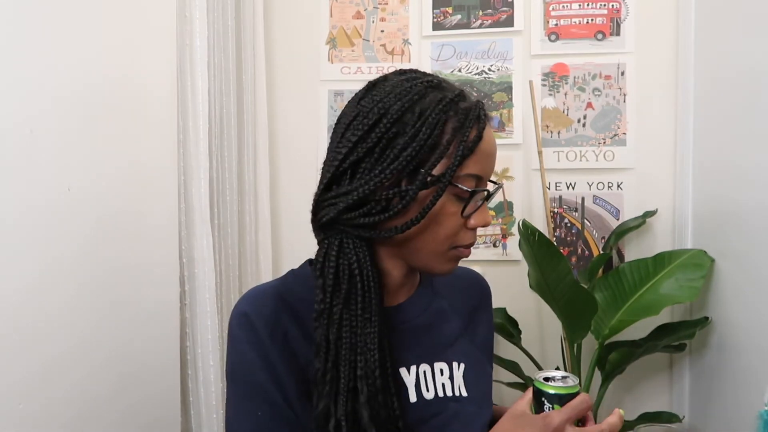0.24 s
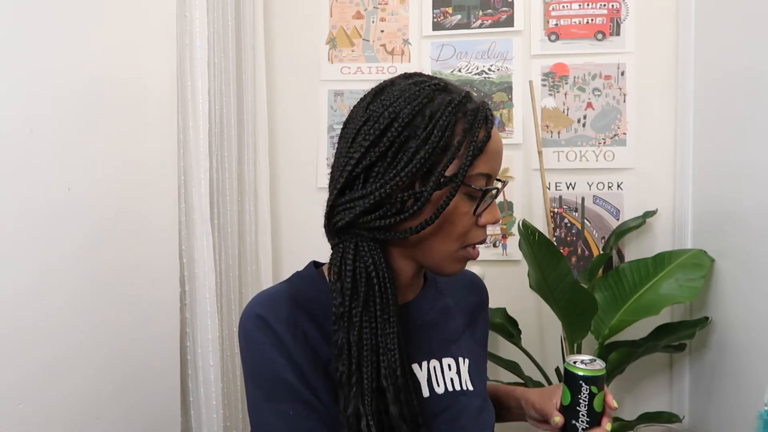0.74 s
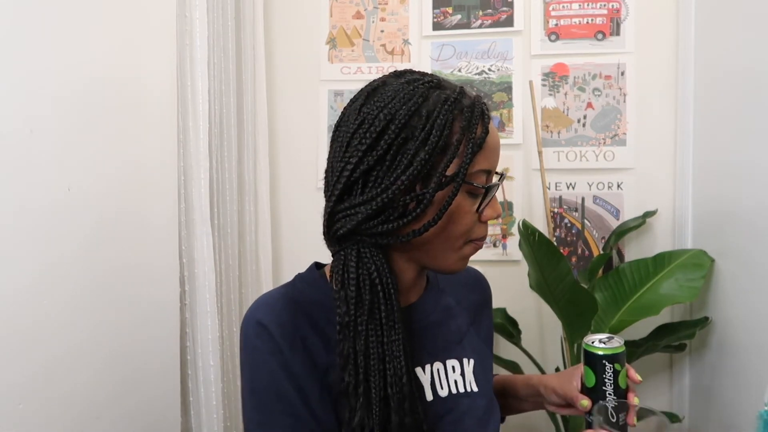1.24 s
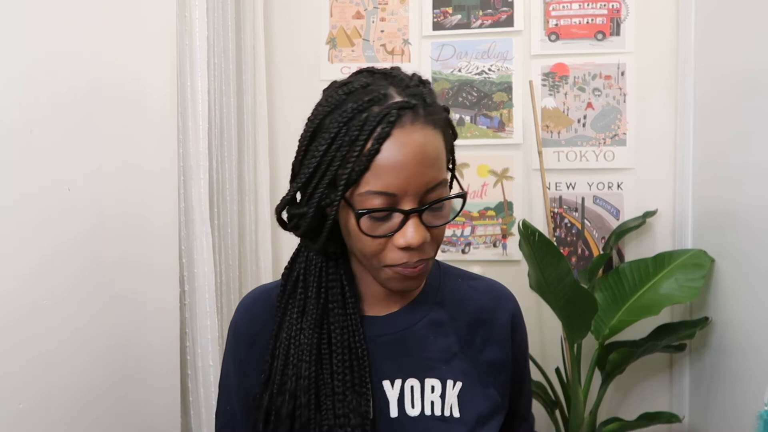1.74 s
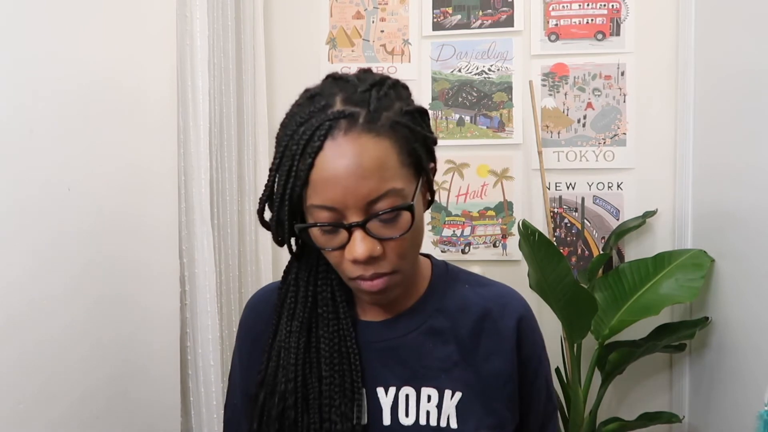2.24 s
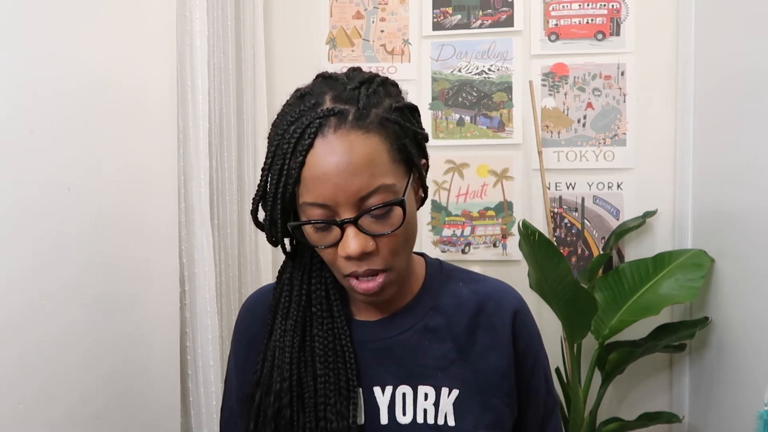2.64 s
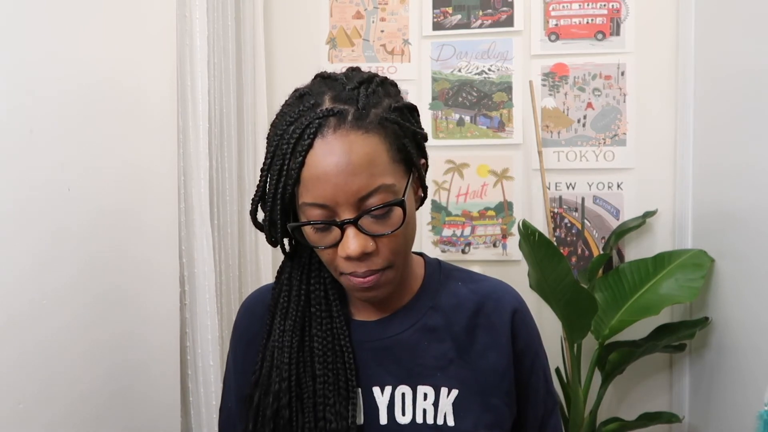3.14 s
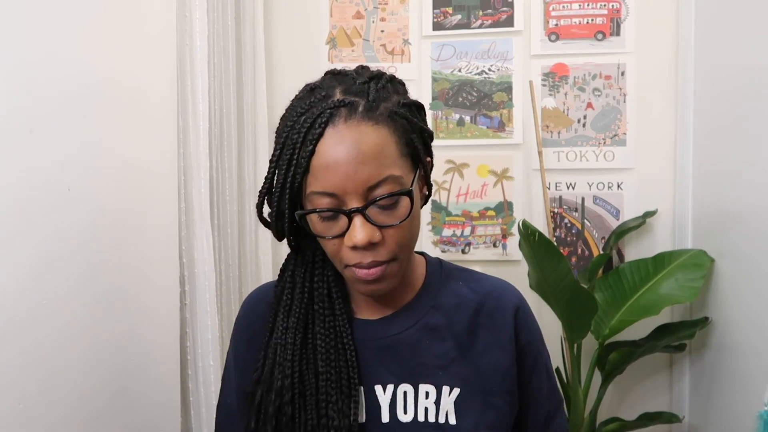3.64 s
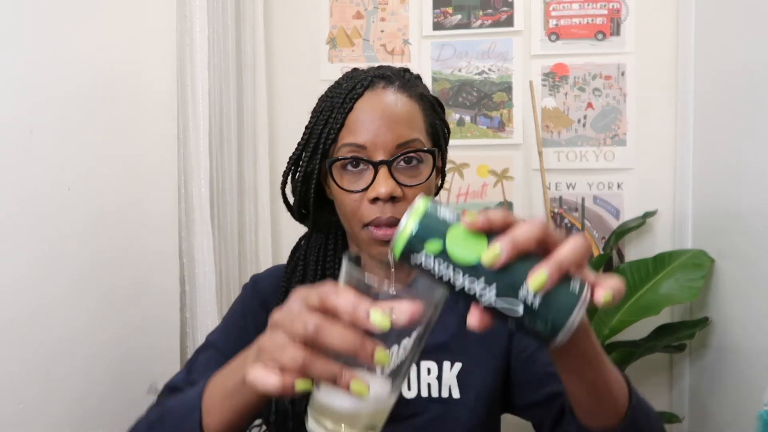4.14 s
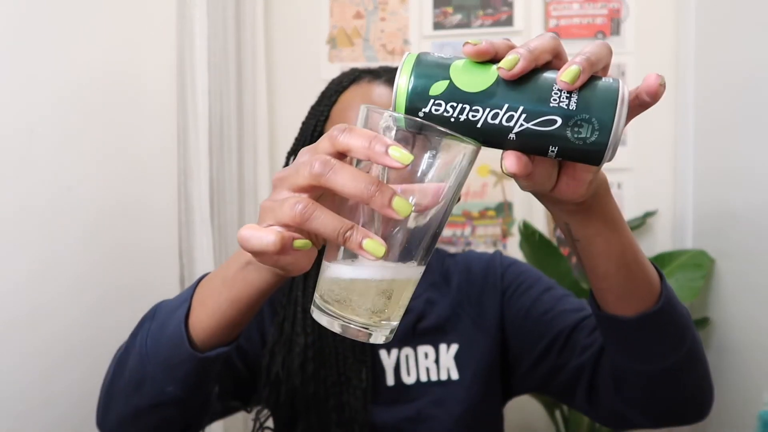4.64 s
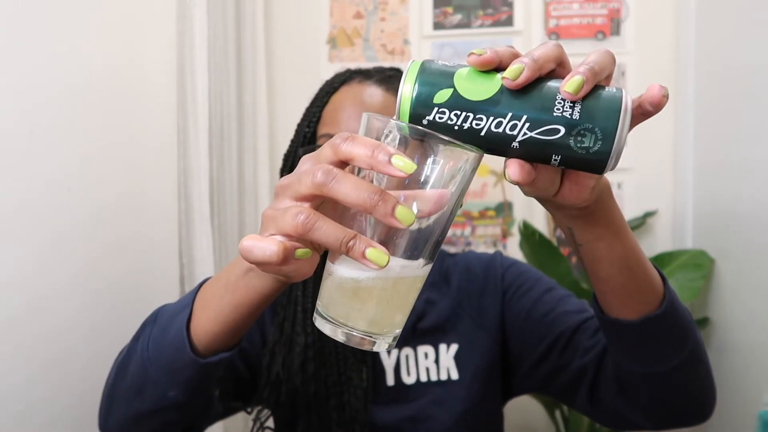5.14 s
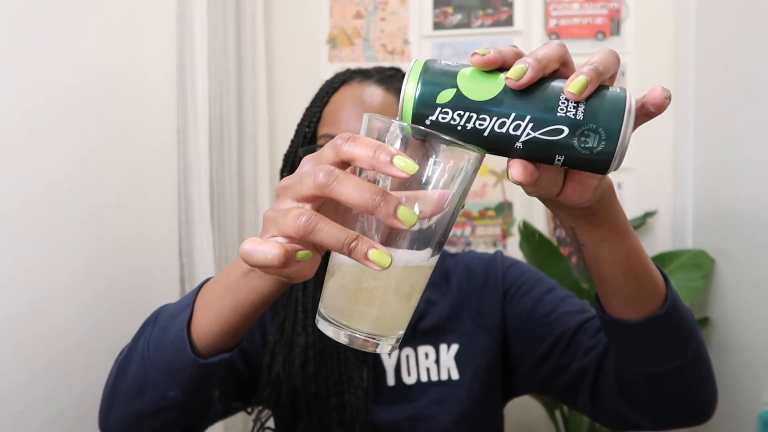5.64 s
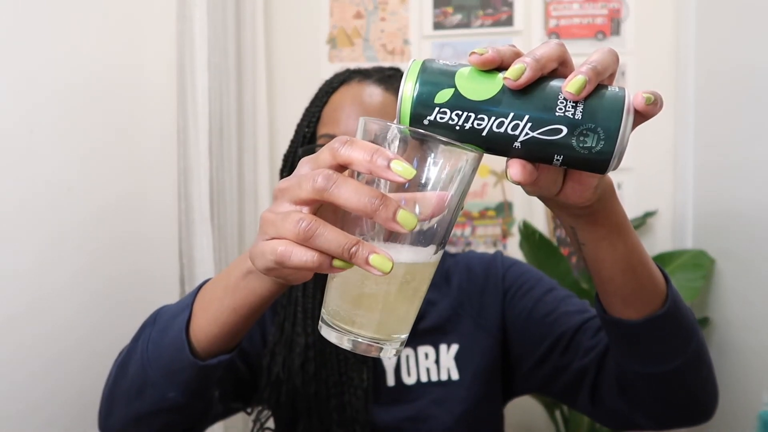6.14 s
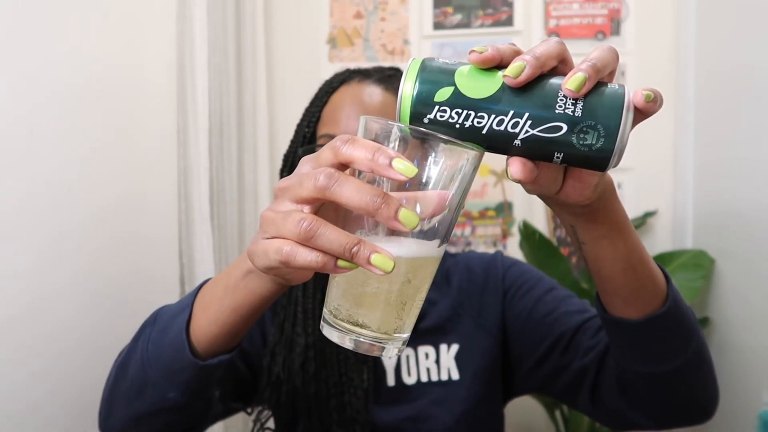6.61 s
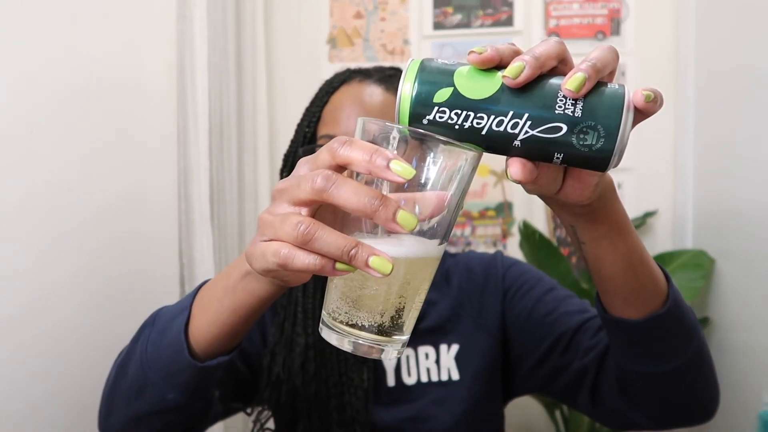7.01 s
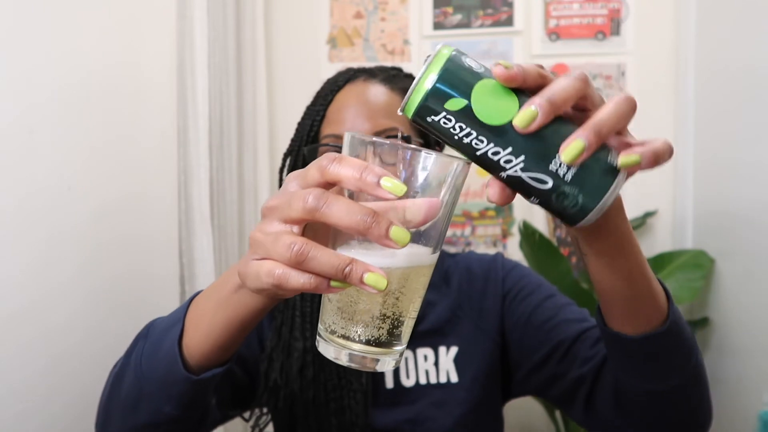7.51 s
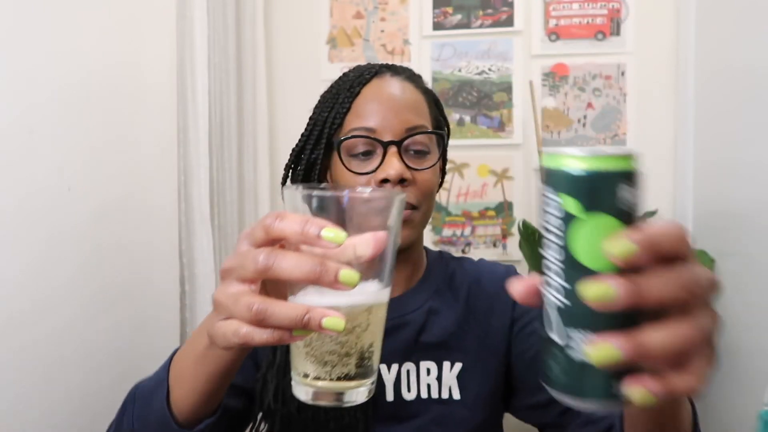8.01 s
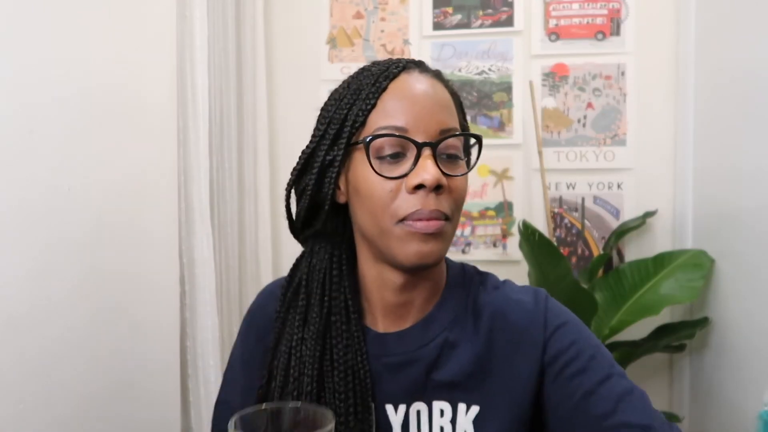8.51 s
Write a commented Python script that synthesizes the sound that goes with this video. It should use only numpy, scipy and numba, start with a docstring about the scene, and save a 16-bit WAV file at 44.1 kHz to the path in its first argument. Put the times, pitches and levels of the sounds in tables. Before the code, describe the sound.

A close mono sound in a small, fairly dry room with steady low electric hum, deep uneven rumble and faint hiss. A soft table thud comes at 0.1 s, followed by sparse faint scrapes and ticks of a handled can, growing busier from 1.7 to 2.4 s with a light bump at 2.3. At about 2.5 s fizzy juice hits the glass with a bright spit and gushes until 3.9: hollow glugs, splashes and one especially strong plop near 3.2, ending in a crowded gurgle and a swell of fizz. Foam hisses alone until 4.7, when a shorter, softer gush runs to 5.15. It thins into a gentle bubbling trickle until about 7.7, with a faint knock near 6.9 and the glass's resonance shifting as it fills. Fine fizz lingers, rising slightly, and at 8.55 a firm low thud with a small metallic clack sets the can down.

```python
"""Clicks and bumps of a handled can, then two gushes and a thinning trickle of fizzy juice into a glass;
foam fizzes on, a last bump sets the can down; low electric hum, rumble and hiss in a small room.
Bubbles are damped sines, drops and scrapes are noise bursts, fizz is a dense bubble swarm plus noise.
Moving resonances shift the pitch and level of the ringing air as the glass fills;
air gurgles into the can."""
import sys
import numpy as np
from scipy import signal
from scipy.fft import rfft, irfft, next_fast_len
from scipy.io import wavfile
from scipy.ndimage import map_coordinates
from numba import njit

SR = 44100
rng = np.random.default_rng(int(sys.argv[2]) if len(sys.argv) > 2 else 0)


def waveform_to_disk(signal):
    """Save audio, clipped to [-1, 1], as 16-bit WAV at the path in sys.argv[1]."""
    frames = np.transpose(np.atleast_2d(signal))
    scaled = np.clip(frames, -1, 1) * 32767
    samples = np.round(scaled).astype(np.int16)
    wavfile.write(sys.argv[1], SR, samples)


N = 386757
TOP_HZ = 15900  # band limit

# air column shortened by drink and foam: [t/s, fill/0-1]
FILL_CURVE = [(2.5, 0.15), (3.2, 0.14), (3.8, 0.23), (4.3, 0.21), (5.0, 0.28), (5.6, 0.42), (6.7, 0.52),
              (7.4, 0.71), (8.0, 0.86), (8.7, 0.83)]
# air resonances of glass and can: [f empty/Hz, f full/Hz, width/Hz, level empty/dB, level full/dB]
AIR_MODES = [(607.6, 965, 68, 6, -6.5), (1080, 970, 160, -12.5, 3.5), (1804, 1430, 270, -8.5, -8.5),
             (1587, 3020, 150, 3, -13.5), (2240, 2510, 460, -20.5, 1.5), (2800, 4070, 150, 9, -39),
             (3735, 3350, 280, 15, -50.5), (4400, 3200, 140, 0, -38)]
# loudest drops on surface or wall: [t/s, ping peak/dB, slap/dB before trim, spray/dB before trim]
LOUD_DROPS = [(2.48, -37, -62, -37.5), (2.511, -29.5, -35.5, -46), (2.585, -32, -30.5, -52),
              (2.611, -26, -57, -51), (2.781, -33.5, -49, -46.5), (2.907, -36, -28.5, -54),
              (3.118, -24.5, -42, -47), (3.175, -40, -36, -44), (3.202, -31, -45, -48),
              (3.247, -37, -46, -40.5), (3.401, -38, -29.5, -56), (3.446, -31, -37.5, -51),
              (3.621, -27, -41, -51), (3.690, -25.5, -47, -45), (3.752, -29.5, -30, -38),
              (3.827, -48, -29.5, -56), (4.720, -37, -39, -50.5), (4.785, -43, -35, -52),
              (5.002, -30.5, -34, -46.5), (5.103, -32, -35.5, -65), (5.118, -32, -47, -46),
              (5.139, -39, -37, -45), (5.286, -38, -35.5, -65), (5.330, -38, -46, -50),
              (5.551, -49, -35, -66), (6.731, -42, -42, -64), (7.063, -42, -37.5, -56),
              (7.318, -34, -40, -55), (7.390, -34, -47, -64)]
# two gushes, then a long trickle: [start/s, end/s, big bubbles/dB, spatter/dB]
STREAMS = [(2.49, 3.888, -62, -0.5), (4.676, 5.161, -46, -0.5), (5.171, 7.662, -52.5, -10.5)]
POUR_ATTACK_S, POUR_RELEASE_S = 0.012, 0.05


def amp(db):
    """Decibels to linear gain."""
    return 10 ** (np.asarray(db) / 20)


def unit(x):
    """Scale to rms 1."""
    return x / np.sqrt(np.mean(x ** 2) + 1e-20)


def peaked(x):
    """Scale to peak 1."""
    return x / (np.abs(x).max() + 1e-20)


def along(points, hz):
    """Interpolate (Hz, value) points on a log frequency axis."""
    f, v = np.transpose(points)
    return np.interp(np.log(hz + 1), np.log(f + 1), v)


def fill_at(s):
    """Fill of the glass, 0-1, at s seconds."""
    return np.interp(s, *np.transpose(FILL_CURVE))


def wobble(rate):
    """Smooth random curve, rate knots per second."""
    knots = rng.standard_normal(int(N * rate / SR) + 4)
    return map_coordinates(knots, [np.arange(N) * rate / SR])


def filtered(x, response):
    """Multiply the spectrum of x by a response of frequency."""
    m = next_fast_len(len(x) + 8192)
    return irfft(rfft(x, m) * response(np.fft.rfftfreq(m, 1 / SR)), m)[:len(x)]


def noise(spectrum, size):
    """Coloured noise of rms 1; spectrum as (f/Hz, density/dB) points."""
    return unit(filtered(rng.standard_normal(size), lambda hz: amp(along(spectrum, hz))))


def fade(t, t60):
    """Exponential decay, -60 dB at t60."""
    return np.exp(-np.log(1000) * t / t60)


def add(track, s, sound):
    """Mix a sound in at s seconds."""
    part = track[max(round(s * SR), 0):][:len(sound)]
    part += sound[:len(part)]


def swell(start, end, attack, release):
    """Envelope: linear rise, hold until end, exponential release; all in seconds."""
    t = np.arange(N) / SR
    return np.clip((t - start) / attack, 0, 1) * np.exp(-np.maximum(t - end, 0) / release)


@njit
def resonate(x, hz, width):
    """One-pole complex resonator, peak gain about 1, whose centre may move."""
    y, z, pole = np.zeros(len(x)), 0j, 0j
    keep = np.exp(-np.pi * width / SR)
    for i in range(len(x)):
        if i % 16 == 0:
            pole = keep * np.exp(2j * np.pi * hz[i] / SR)
        z = z * pole + x[i]
        y[i] = 2 * (1 - keep) * z.real
    return y


def background():
    """Electric hum as sines, uneven deep rumble that holds then ebbs, and faint hiss, both as noise."""
    # hum partials: [f/Hz, level/dB rms]
    hum_partials = [(120, -37.5), (177, -66.5)]
    # rumble spectrum: [f/Hz, density/dB per Hz]
    rumble_spectrum = [(15, -45), (28, -28), (42, -0.5), (58, 2), (72, -2.5), (90, -19.5), (130, -19.5),
                       (200, -41), (300, -46.5), (600, -62), (2000, -120)]
    # hiss spectrum: [f/Hz, density/dB per Hz]
    hiss_spectrum = [(120, -26), (200, -3), (328, -11.5), (359, -6), (557, -12), (1640, -16), (2490, -18),
                     (10600, -27), (15800, -34)]
    start_db, hold_s, ebb_db_per_s, waver_db = -30, 3.26, 2, 1.05
    t = np.arange(N) / SR
    hum = np.zeros(N)
    for hz, db in hum_partials:
        hum += amp(db + 0.27 * wobble(3.1)) * np.sqrt(2) * np.sin(2 * np.pi * hz * t)
    rumble_db = start_db - ebb_db_per_s * np.maximum(t - hold_s, 0) + waver_db * wobble(7)
    rumble = amp(rumble_db) * noise(rumble_spectrum, N)
    return hum + rumble + amp(-60.5) * noise(hiss_spectrum, N)


def ticks():
    """Can and glass shift in the hands: noise scrapes, each exciting one ring that sags in pitch."""
    # shifts; the last, a soft hiss at 2.452 s, leads into the pour:
    # [t/s, peak/dB, initial ring f/Hz, scrape t60/s, grit over ring input/dB]
    scrapes = [(.04, -50, 3700, 0.2, -8), (0.538, -41, 1710, 0.18, -10), (.845, -41.5, 3550, 0.073, -14),
               (.953, -50, 540, 0.092, -28), (1.14, -47.5, 580, .13, -37), (1.675, -44, 438, 0.042, -38),
               (1.754, -39.5, 7800, .13, 0), (1.759, -38.5, 1490, 0.16, -38),
               (2.089, -35.5, 4140, 0.028, -22), (2.223, -48.5, 1210, 0.36, -26),
               (2.268, -32.5, 11300, 0.038, 15), (2.344, -40.5, 640, 0.078, -24),
               (2.452, -39, 6000, 0.1, -18)]
    rise_share, sag_per_s = 0.022, 3.5  # rise time constant over t60; log pitch fall
    out, t = np.zeros(N), np.arange(SR // 4) / SR
    for s, db, hz, t60, grit_db in scrapes:
        envelope = fade(t, t60) * (1 - np.exp(-t / (rise_share * t60))) ** 2
        scrape = rng.standard_normal(len(t)) * envelope
        tilt = [(hz / 3, -15), (hz, 0), (4 * hz, -3), (10 * hz, -10)]
        grit = filtered(scrape, lambda f: amp(along(tilt, f)))
        ring = resonate(grit, hz * np.exp(-sag_per_s * t), 0.18 * hz)
        add(out, s, amp(db) * peaked(amp(grit_db) * grit + ring))
    return out


def knocks():
    """A bump rings table-top modes as a thud, and can modes plus a noise crack as a clack."""
    # bumps on the table: [t/s, thud/dB, clack/dB]
    bumps = [(.113, -25, -53), (.955, -43.5, -53.5), (2.304, -32.5, -65), (6.868, -38.5, -64),
             (8.545, -32, -35), (8.554, -18, -35.5)]
    # table-top modes: [f/Hz, mean level/dB, t60/s]
    table_modes = [(163, 5.5, 0.18), (205.5, 9, 0.086), (255, 5, 0.048), (387, -7.5, 0.13),
                   (540, -14, 0.033)]
    # can modes: [f/Hz, mean level/dB, t60/s]
    can_modes = [(1050, -4, 0.055), (1826, 6.5, 0.035), (2720, -5, 0.023), (4720, -5, 0.12),
                 (5250, -7, 0.032)]
    crack_spectrum = [(300, 6.5), (2000, -12.5), (6000, -14), (15000, -24)]
    out, t = np.zeros(N), np.arange(SR // 3) / SR

    def ring(modes):
        """Damped sines with level scatter, peak 1."""
        total = np.zeros(len(t))
        for hz, db, t60 in modes:
            total += amp(db + rng.normal(0, 2.1)) * fade(t, t60) * np.sin(2 * np.pi * hz * t)
        return peaked(total)

    for s, db, clack_db in bumps:
        add(out, s, amp(db) * ring(table_modes) * (1 - np.exp(-t / 0.00085)))
        crack = noise(crack_spectrum, len(t)) * fade(t, 0.13)
        add(out, s, amp(clack_db) * (ring(can_modes) + amp(-4.5) * crack))
    return out


def room(x):
    """Short diffuse wall tail: noise decaying per frequency, redrawn every third of a second."""
    # room decay: [f/Hz, t60/s]
    decay = [(150, 0.2), (700, 0.2), (4000, 0.11), (14000, 0.13)]
    out, hop = np.zeros(N), SR // 3
    for i in range(0, N, hop):
        hz, t, z = signal.stft(rng.standard_normal(SR // 2), SR, nperseg=256)
        tail = signal.istft(z * fade(t, along(decay, hz)[:, None]), SR, nperseg=256)[1]
        add(out, i / SR + 0.006, signal.fftconvolve(x[i:i + hop], tail / np.linalg.norm(tail)))
    return out


def glass(x, fill, leak_db):
    """Sound made in the glass: direct leak plus air modes that shift in pitch and level with fill."""
    fill = fill + np.zeros(len(x))
    out = amp(leak_db) * x
    for hz0, hz1, width, db0, db1 in AIR_MODES:
        mode = resonate(x, hz0 + (hz1 - hz0) * fill, float(width))
        out = out + amp(db0 + (db1 - db0) * fill) * mode
    return out


def bubbles(rate, pitch_hz, spread, cycles, scatter_db, size):
    """Random swarm of bubbles, each a damped sine whose pitch first rises; rms 1."""
    count = int(min(rate * N / SR, 5e6 / size))
    start = rng.integers(0, N, count)
    hz = np.minimum(pitch_hz * np.exp(spread * rng.standard_normal((count, 1))), TOP_HZ)
    strength = amp(scatter_db * np.minimum(rng.exponential(size=(count, 1)), 4))
    turns = hz * np.arange(size) / SR
    phase = 2 * np.pi * turns * (1 + 0.12 * np.minimum(turns / cycles, 1))
    rings = strength * fade(turns, cycles) * np.sin(phase)
    index = start[:, None] + np.arange(size)
    return unit(np.bincount(index.ravel(), rings.ravel(), N)[:N])


def surging(lag=0):
    """Air drawn into the can as it tips further: each surge grows to a crest and ebbs; lag in seconds."""
    # surges: [crest t/s, gurgle/dB, rise/dB per s, fall/dB per s]
    surges = [(3.82, -42.5, 52, 127), (5.12, -49.5, 35, 38), (7.40, -58.5, 23, 11)]
    t = np.arange(N) / SR - lag
    level = np.zeros(N)
    for s, db, rise, fall in surges:
        level += amp(db - rise * np.maximum(s - t, 0) - fall * np.maximum(t - s, 0))
    return level


def foam():
    """Foam head: noise seethes through the glass modes while bursting bubbles make a fine fizz."""
    # fizz level before gain: [t/s, level/dB]
    fizz_level = [(2.3, -66), (2.62, -62), (3.61, -57.5), (3.83, -47.5), (3.97, -54.5), (4.5, -58.5),
                  (4.95, -59.5), (5.38, -60), (8.59, -55), (8.77, -52.5)]
    # fizz noise spectrum: [f/Hz, density/dB per Hz]
    fizz_spectrum = [(800, -35), (1500, -26), (3200, 2), (5000, -1.5), (7500, -1), (9500, -3.5),
                     (11700, -1), (14000, -6), (15800, -7.5)]
    fizz_gain_db, surge_fizz_db, flutter_db = 0.6, -12, 1  # surge fizz over gurgle; flutter at full spatter
    start_s, build_s, lag_s = 2.35, 2.5, 0.12  # lag: foam rises after a surge
    low_db, mid_db, mid_damping_db = -57.5, -55.5, 6.5  # a full glass damps the middle
    low_spectrum = [(150, -27), (350, -23), (700, 5), (1050, 3), (1500, -2), (3000, -48)]
    mid_spectrum = [(700, -19), (1500, 15), (3500, 3.5), (5000, -25), (9000, -42)]
    t = np.arange(N) / SR
    fill = fill_at(t)
    low = unit(glass(noise(low_spectrum, N), fill, leak_db=-27))
    mid = unit(glass(noise(mid_spectrum, N), fill, leak_db=-16))
    seethe = amp(low_db) * low + amp(mid_db - mid_damping_db * fill) * mid

    bursts = bubbles(rate=5000, pitch_hz=7100, spread=0.63, cycles=6.1, scatter_db=8.5, size=64)
    fizz = unit(amp(-7.5) * bursts + noise(fizz_spectrum, N))
    # fizz rings the air, less as foam nears the rim
    fizz = fizz + amp(-27 * fill) * glass(fizz, fill, leak_db=-40)
    # fizz flutters while the stream stirs it, swells just after each surge
    stirred = np.zeros(N)
    for start, end, _, spatter_db in STREAMS:
        stirred += amp(spatter_db) * swell(start, end, POUR_ATTACK_S, POUR_RELEASE_S)
    steady = amp(np.interp(t, *np.transpose(fizz_level)) + fizz_gain_db)
    level = np.hypot(steady, amp(surge_fizz_db) * surging(lag_s))
    level = level * amp(flutter_db * stirred * wobble(40))

    age = t - start_s
    build = np.sqrt(np.clip(age / build_s, 0, 1))
    return build * seethe + np.clip(age / POUR_ATTACK_S, 0, 1) * level * fizz


def strays(rate):
    """Loosely spaced moments while drink runs: rows of (t/s, spatter/dB, fill, two chance values)."""
    rows = []
    for start, end, _, spatter_db in STREAMS:
        for k, (late, a, b) in enumerate(rng.standard_normal((100, 3))):
            s = start + (k + 1 + late / 2) / rate
            if start < s < end:
                rows.append((s, spatter_db, fill_at(s), a, b))
    return rows


def splashes():
    """A drop slaps the air in the glass, pings its cross modes and throws a short bright spray."""
    # spray spectrum: [f/Hz, density/dB per Hz]
    spray_spectrum = [(1500, -30), (4000, 5), (7500, 8), (10000, 2), (15000, 0)]
    slap_spectrum = [(300, -9), (800, 4.5), (1300, 0.5), (2500, -5.5), (3200, -26.5), (6000, -53)]
    ping_spectrum = [(1500, -36), (2400, 9), (3000, 1.5), (4200, 1.5), (7000, -21), (12000, -28)]
    drops_per_s, scatter_db = 17, 3  # lesser drops
    base_ping_db, base_slap_db, base_spray_db = -35.5, -46, -54  # at full spatter, before trims
    foam_dulls_db = 12  # a full glass muffles ping and spray of lesser drops
    out, t = np.zeros(N), np.arange(SR // 14) / SR
    drops = []
    for s, db, fill, a, b in strays(drops_per_s):
        bright_db = db + scatter_db * a - foam_dulls_db * fill
        slap_db = base_slap_db + db + scatter_db * b
        drops.append((s, base_ping_db + bright_db, slap_db, base_spray_db + bright_db))
    for s, ping_db, slap_db, spray_db in LOUD_DROPS + drops:
        fill = fill_at(s)
        slap = noise(slap_spectrum, len(t)) * fade(t, 0.041)
        ping = noise(ping_spectrum, len(t)) * fade(t, 0.018)
        add(out, s, amp(slap_db + 3.5) * peaked(glass(slap, fill, leak_db=-26)))
        add(out, s, amp(ping_db) * peaked(glass(ping, fill, leak_db=-36)))
        # cubed noise: droplets of very uneven size
        mist = rng.standard_normal(len(t)) ** 3
        droplets = unit(filtered(mist, lambda hz: amp(along(spray_spectrum, hz))))
        envelope = fade(t, 0.047) * (1 - np.exp(-t / 0.0011))
        add(out, s, amp(spray_db + 7) * droplets * envelope)
    return out


def pour():
    """The stream churns bubbles of all sizes into the drink and spits; air gurgles in the can's hollow."""
    surge_big_db, surge_small_db = 2, 4.5  # bubbles a surge adds, over its gurgle
    small_db, small_limit_db = -55.5, -53  # under a running stream; most a surge adds
    spit_db, first_spit_db, first_spit_s = -59.5, -40.5, 0.01  # strongest as drink meets the dry glass
    waver_db = 1
    fill = fill_at(np.arange(N) / SR)
    running, churning, spatter = np.zeros((3, N))
    for start, end, big_db, spatter_db in STREAMS:
        on = swell(start, end, POUR_ATTACK_S, POUR_RELEASE_S)
        running += on
        churning += amp(big_db) * on
        spatter += amp(spatter_db) * on
    surge = running * surging()

    gurgle = bubbles(rate=260, pitch_hz=399, spread=0.27, cycles=25, scatter_db=3, size=1200)
    can = surge * unit(resonate(gurgle, np.full(N, 385.0), 80.0))

    big = bubbles(rate=420, pitch_hz=794, spread=0.23, cycles=16, scatter_db=5.5, size=1200)
    big_level = np.hypot(churning, amp(surge_big_db) * surge)
    big = big_level * unit(glass(big, fill, leak_db=-47))

    small = bubbles(rate=800, pitch_hz=2710, spread=0.363, cycles=29, scatter_db=3.5, size=500)
    small_surge = np.minimum(amp(surge_small_db) * surge, amp(small_limit_db))
    small_level = np.hypot(amp(small_db) * running, small_surge)
    small = small_level * unit(glass(small, fill, leak_db=-32))

    first_s = LOUD_DROPS[0][0]
    first_spit = swell(first_s, first_s + first_spit_s, 0.0059, first_spit_s)
    spit_level = amp(spit_db) * spatter + amp(first_spit_db) * first_spit
    spit = bubbles(rate=900, pitch_hz=6130, spread=0.213, cycles=72, scatter_db=2.5, size=350)
    return amp(waver_db * wobble(25)) * (can + big + small + spit_level * spit)


def glugs():
    """Each big bubble rings briefly and sets the air column going; the drink churns in its wake."""
    # biggest, clearest bubbles: [t/s, peak/dB, f/Hz, t60/s]
    clear_bubbles = [(2.557, -26, 935, 0.018), (2.570, -30, 660, 0.06), (2.585, -30.5, 1050, 0.063),
                     (2.784, -16, 800, 0.024), (2.907, -16.5, 830, 0.0098), (3.074, -19.5, 700, 0.045),
                     (3.118, -30, 693, 0.12), (3.177, -5, 709, 0.031), (3.246, -20.5, 694, .018),
                     (3.442, -28, 720, 0.017), (3.566, -36.5, 745, 0.04), (3.600, -29, 770, 0.078),
                     (3.620, -33.5, 960, .066), (3.642, -26.5, 826, 0.066), (3.724, -28, 795, 0.11),
                     (3.752, -26.5, 910, 0.031), (3.768, -24.5, 752, 0.073), (3.787, -26.5, 778, .08),
                     (3.827, -23.5, 894, 0.037), (3.852, -20.5, 834, 0.051), (4.692, -27.5, 1060, 0.017),
                     (4.702, -32, 450, 0.062), (4.744, -17.5, 579, 0.055), (4.851, -24.5, 580, 0.03),
                     (5.002, -32.5, 987, 0.023), (5.006, -32.5, 375, 0.065), (5.050, -19.5, 720, 0.0092),
                     (5.117, -28.5, 648, 0.071), (5.138, -24, 623, 0.038), (5.331, -25.5, 950, 0.02),
                     (6.730, -37, 910, 0.032)]
    plops_per_s, plop_db, scatter_db = 11, -37.5, 1  # lesser bubbles, at full spatter
    over_air, spread, plop_t60_s = 1.06, 0.115, 0.036  # pitch near the first air mode
    churn_spectrum = [(150, -37), (260, -16), (370, -6), (600, -25), (1000, 9), (1400, -4),
                      (2000, -13), (4000, -55)]
    out, t = np.zeros(N), np.arange(SR // 5) / SR
    empty_hz, full_hz = AIR_MODES[0][:2]
    plops = []
    for s, db, fill, a, b in strays(plops_per_s):
        air_hz = empty_hz + (full_hz - empty_hz) * fill
        hz = over_air * air_hz * np.exp(spread * b)
        plops.append((s, plop_db + db + scatter_db * a, hz, plop_t60_s))
    for s, db, hz, t60 in clear_bubbles + plops:
        bubble = np.sin(2 * np.pi * hz * t) * fade(t, t60) * (1 - np.exp(-t / 0.0026))
        add(out, s, amp(db) * peaked(glass(bubble, fill_at(s), leak_db=-46)))
        # churn grows with the bubble's level up to a ceiling
        churn = noise(churn_spectrum, len(t)) * fade(t, 0.081)
        add(out, s, amp(min(db, -22) - 17.5) * churn)
    return out


def scene():
    """Near sources, their room tail at -6 dB, and the background; one channel."""
    near = ticks() + knocks() + foam() + splashes() + pour() + glugs()
    return (near + amp(-6) * room(near) + background())[None]


def record(dry):
    """Cut everything above the band limit."""
    return np.array([filtered(x, lambda hz: hz < TOP_HZ) for x in dry])


dry = scene()
out = record(dry)
waveform_to_disk(out)
```